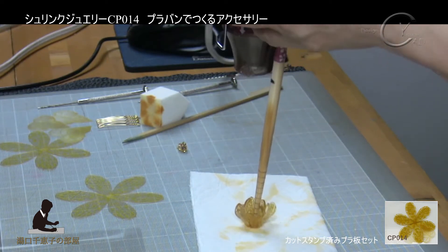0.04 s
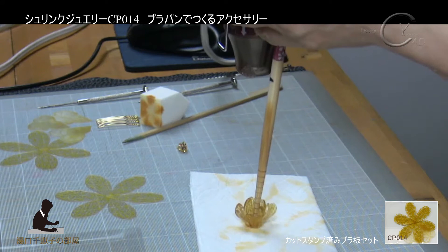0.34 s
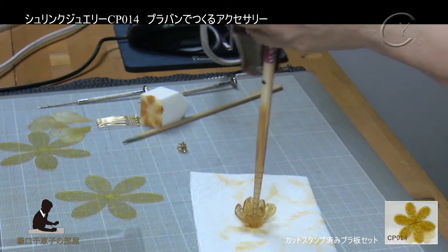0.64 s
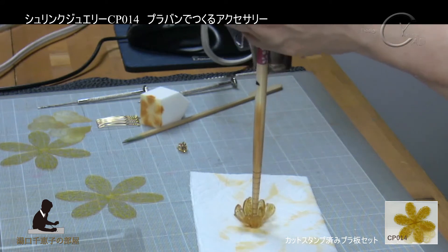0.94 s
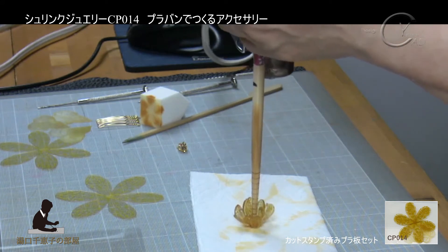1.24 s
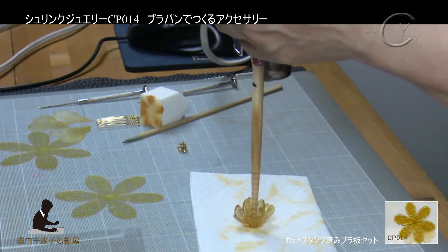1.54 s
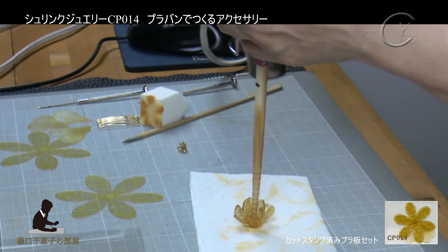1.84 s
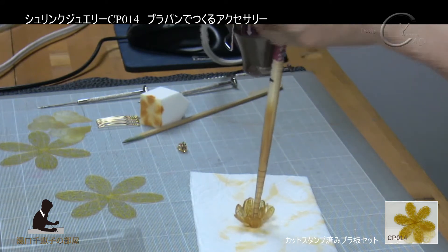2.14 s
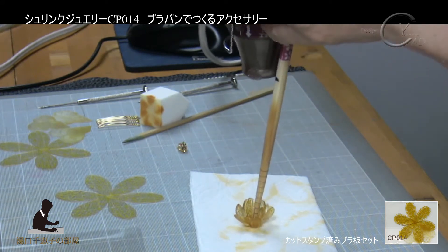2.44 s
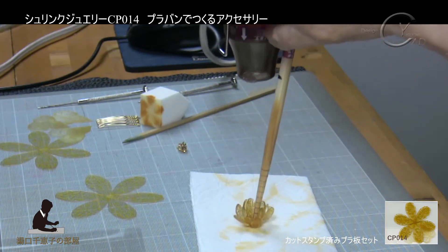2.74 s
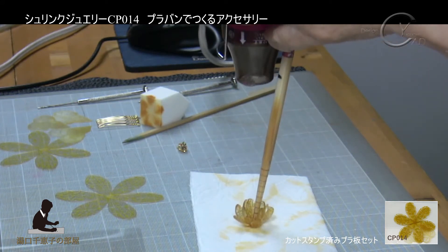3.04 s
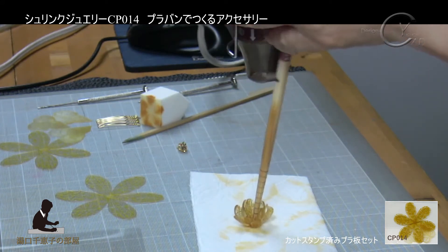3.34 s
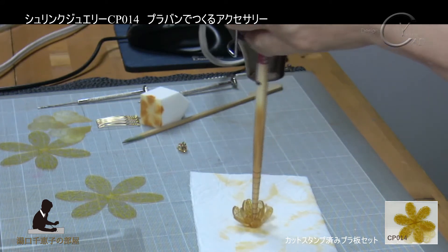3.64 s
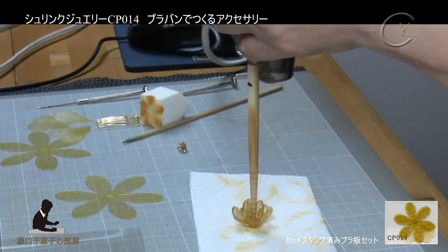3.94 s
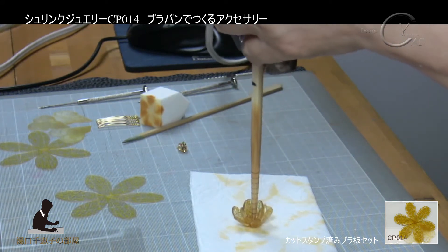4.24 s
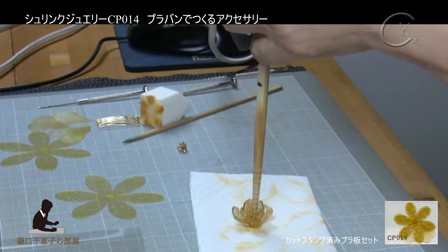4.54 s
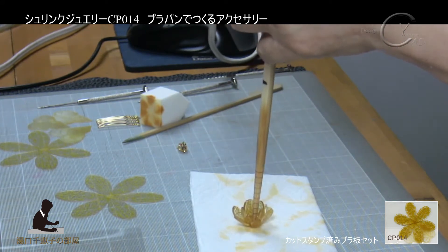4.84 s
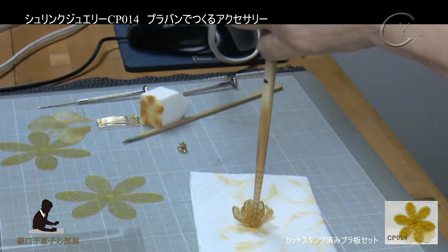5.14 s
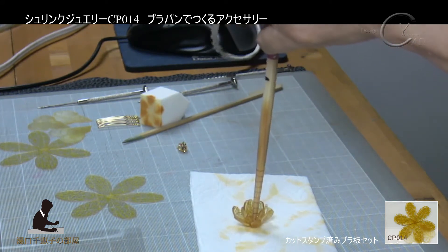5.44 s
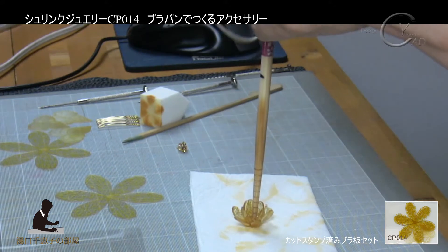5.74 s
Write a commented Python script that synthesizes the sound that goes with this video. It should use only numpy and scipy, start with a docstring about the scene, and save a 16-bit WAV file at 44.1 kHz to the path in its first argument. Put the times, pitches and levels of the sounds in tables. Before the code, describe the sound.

Close hissing air and a fan's whine from a handheld heat gun, cut by a switch snap, then a falling whirr.

```python
"""A close rush of air with a whine on top: a small heat gun sways in the hand over a craft table.
Its five-blade fan whines over air rushing through the barrel, and the table top throws the hiss back.
At about 5.1 s the thumb snaps the switch off and the fan glides down to rest, its bearings whirring.
The grip rustles and the gun is shifted with a light knock, in a small, quiet room."""
import sys
import numpy as np
from scipy import signal
from scipy.fft import rfft, irfft
from scipy.io import wavfile
from scipy.ndimage import uniform_filter1d

SR = 44100
rng = np.random.default_rng(int(sys.argv[2]) if len(sys.argv) > 2 else 0)


def file_out(sig):
    """Save sig as 16-bit WAV at sys.argv[1]."""
    # one column per channel
    cols = np.atleast_2d(sig).T
    # limit, then scale
    lim = np.clip(cols, -1, 1)
    pcm = np.round(lim * 32767).astype(np.int16)
    wavfile.write(sys.argv[1], SR, pcm)


N = 258852
TIME = np.arange(N) / SR


def amp(db):
    """Decibels to gain."""
    return np.exp(np.asarray(db) * (np.log(10) / 20))


def unit(x):
    """Scales to rms 1."""
    return x / np.sqrt(np.mean(x ** 2) + 1e-20)


def curves(rows, t=TIME):
    """Automation lanes: each column of (t/s, ...) rows, joined by straight lines."""
    times, *columns = np.transpose(rows)
    return [np.interp(t, times, column) for column in columns]


def spectrum(points, hz):
    """Reads (f/Hz, value) points on a log-frequency axis."""
    f, value = np.transpose(points)
    return np.interp(np.log(hz + 1), np.log(f), value)


def bumps(modes, hz):
    """EQ curve in dB from (f/Hz, width/Hz, gain/dB) resonances."""
    return sum(db / (1 + (2 * (hz - f) / width) ** 2) for f, width, db in modes)


def hump(t, peak_s, attack_s, release_s):
    """A smooth swell to 1 and a smooth fall."""
    return np.exp(-((t - peak_s) / np.where(t < peak_s, attack_s, release_s)) ** 2)


def drift(rate_hz, size=4096):
    """Random modulation of rms 1, up to about the given rate."""
    hz = np.fft.rfftfreq(size, TIME[-1] / size)
    slow = irfft(rfft(rng.standard_normal(size)) / (1 + (hz / rate_hz) ** 4))
    return np.interp(TIME, np.linspace(0, TIME[-1], size), unit(slow))


def patches(shape, frames, bins):
    """Random time-frequency patches of rms 1."""
    smeared = uniform_filter1d(rng.standard_normal(shape), frames, 0)
    return unit(uniform_filter1d(smeared, bins, 1))


def noise(field_db, size=2048):
    """Noise of rms 1 whose short-time spectrum takes the shape of field_db(t, hz)."""
    hop = size // 4
    t, hz = np.arange(N // hop + 5)[:, None] * hop / SR, np.fft.rfftfreq(size, 1 / SR)
    white = rng.standard_normal((len(t), len(hz), 2)) @ [1, 1j]
    shaped = white * amp(field_db(t, hz))
    return unit(signal.istft(shaped.T, nperseg=size, noverlap=size - hop)[1][:N])


# shaft speed under power: (t/s, speed/(turns/s))
POWERED_SPEED = [(0.05, 247.4), (0.42, 247.4), (0.75, 248.6), (1.1, 247.3), (1.6, 247.9), (2.25, 248.8),
                 (3.0, 249.2), (3.6, 248.5), (5.1, 248.4)]
OFF_S = 5.13  # the power is cut


def shaft_speed(t=TIME, drag_s=0.37, friction_turns_per_s2=146):
    """Turns per second, at least 1: near steady under power, then slowed by air drag and friction."""
    friction = friction_turns_per_s2 * drag_s
    drag = np.exp(-np.maximum(t - OFF_S, 0) / drag_s)
    return np.maximum((curves(POWERED_SPEED, t)[0] + friction) * drag - friction, 1)


def slowing(t=TIME):
    """Speed against full speed, in decades: about 0 under power, negative while coasting."""
    return np.log10(shaft_speed(t) / shaft_speed(OFF_S))


# the hand's sway: (t/s, pose/(- left, + right), table echo delay/ms, hiss towards the microphone/dB)
SWAY = [(0, -0.34, 1.7, -.5), (.8, 0.85, 0.76, 0), (1.7, 0.48, 1.07, -1), (2.3, -.7, 1.15, -0.8),
        (2.95, -1.4, 0.92, -0.5), (3.65, 0.39, 0.91, -1), (4.35, 0.71, 0.99, 0.9), (4.7, 0.29, 1.9, -1),
        (5.1, -1.1, 2.1, -1)]
# tone curve of the rushing air: (f/Hz, relative level/dB)
AIR_COLOUR = [(25, -118.7), (60, -113.3), (150, -96), (400, -88), (560, -74.5), (1000, -70), (2000, -71.5),
              (2850, -74.5), (3400, -80.5), (5000, -82.5), (8700, -83), (9800, -90.5), (12300, -93.5),
              (15600, -110.7)]
# the barrel's resonances and notches, lowest first: (f/Hz, width/Hz, gain/dB)
BARREL_EQ = [(621, 166, 13.5), (920, 19, 4.5), (1143, 13, 7), (1243, 228, -15), (1527, 570, 5.5),
             (1730, 18, 6), (1956, 42, 7.5), (2130, 68, 7), (2470, 180, -1), (2630, 363, 11.5),
             (3074, 116, -15.5), (3120, 61, 11.5), (3740, 390, -6), (6240, 1300, 8.5), (7260, 590, -6),
             (10350, 220, 5)]
# resonances of the vents when fully open: (f/Hz, width/Hz, gain/dB)
VENT_EQ = [(3070, 370, 14), (2550, 900, -5), (5200, 1500, 6), (6230, 600, -5.5), (7200, 1000, 6)]
# upper barrel resonances that swell with the sway: (f/Hz, width/Hz, gain/dB per unit sideways, drift/dB)
SWELL_EQ = [(2170, 170, 2.5, 2), (2820, 390, -0.9, 0.5)]
# the jet's strongest gusts, at the barrel's lowest resonance: (t/s, length/s, boost/dB)
JET_GUSTS = [(.46, .08, 2.5), (0.796, 0.1, 6), (1.416, 0.17, 5.5), (2.868, .05, 9.5), (2.974, 0.021, 11),
             (3.96, 0.032, 7), (4.645, 0.08, 4.5)]


def air(level_db=-34.5, body_fall_db=60, hiss_fall_db=72, hiss_hz=3800, table_echo=0.081,
        eddy_db=2.14, streak_db=3.5, burble_db=0.7, lull_db=-1.2):
    """Turbulence coloured by barrel and vents and combed by the table's echo; it dies with the fan."""
    def field_db(t, hz):
        side, echo_ms, facing_db = curves(SWAY, t)
        treble = hz ** 4 / (hz ** 4 + hiss_hz ** 4)
        # reaching for the switch, the hand uncovers the vents
        vents_open = np.interp(t, [4.43, 4.86], [0.085, 0.58])
        colour = spectrum(AIR_COLOUR, hz) + bumps(BARREL_EQ, hz) + vents_open * bumps(VENT_EQ, hz)
        echo = table_echo * treble * np.exp(2j * np.pi * hz * echo_ms / 1000)
        comb = 20 * np.log10(abs(1 + echo))
        # the jet burbles at random between its strong gusts
        gusts = sum(db * hump(t, s, length / 2, length / 2) for s, length, db in JET_GUSTS)
        jet_db = lull_db + gusts + burble_db * np.interp(t, TIME, drift(rate_hz=35))
        jet_hz, jet_width, _ = BARREL_EQ[0]
        burble = bumps([(jet_hz, 2 * jet_width, jet_db)], hz)
        swell = bumps([(f, width, side_db * side + drift_db * np.interp(t, TIME, drift(rate_hz=5.6)))
                       for f, width, side_db, drift_db in SWELL_EQ], hz)
        # brief eddies stir the body of the rush; narrow, longer streaks whistle in the hiss
        eddies = eddy_db * (1 - treble) * patches(comb.shape, frames=6, bins=12)
        streaks = streak_db * treble * patches(comb.shape, frames=22, bins=5)
        fall = slowing(t) * (body_fall_db * (1 - treble) + hiss_fall_db * treble)
        return colour + treble * facing_db + comb + burble + swell + eddies + streaks + fall
    return amp(level_db) * noise(field_db)


def shaft_tone(angle, order, db, phase=0):
    """A sine at a multiple of the shaft's speed, its rms level in dB."""
    return np.sqrt(2) * amp(db) * np.cos(order * angle + phase)


# the whine, each partial beamed its own way:
# (shaft order, level/dB, gain/dB per unit sideways, gain/dB per ms of echo delay)
WHINE_PARTIALS = [(4, -44, -0.1, -1.2), (5, -41.5, -1, -2), (6, -39.5, 0.8, 2.5), (9, -47.5, 6, 1.5)]


def fan_whine(angle, waver_db=1.33, usual_echo_ms=0.98):
    """Uneven blades: the blade tone and its neighbours are in step, so the whine throbs once a turn."""
    side, echo_ms, _ = curves(SWAY)
    lift_ms = echo_ms - usual_echo_ms
    return sum(shaft_tone(angle, k, db + side_db * side + lift_db * lift_ms + waver_db * drift(37))
               for k, db, side_db, lift_db in WHINE_PARTIALS)


# the motor's faint buzz: (shaft order, level/dB)
BUZZ_PARTIALS = [(3, -54), (7, -55), (10, -58), (15, -70), (16, -69), (18, -65), (20, -69), (21, -68),
                 (22, -67), (24, -66), (25, -62), (26, -68), (30, -61), (31, -68), (32, -68), (33, -70),
                 (37, -71), (38, -71), (40, -70), (45, -78), (48, -77)]


def motor_buzz(angle, sway_db=4.0, flutter_db=1.0):
    """Short waves that come and go at random as the gun sways, and flutter in the hot air."""
    return sum(shaft_tone(angle, k, db + sway_db * drift(rate_hz=1.5) + flutter_db * drift(rate_hz=30),
                          phase=2 * np.pi * rng.random()) for k, db in BUZZ_PARTIALS)


# tone curve of the quiet room, also the base of whirr and rustle: (f/Hz, relative level/dB)
ROOM_COLOUR = [(25, -42), (60, -38), (140, -5), (290, -2), (400, -4), (1000, -1), (2200, -6.5), (2850, -5),
               (3500, -9.5), (6000, -11), (10000, -17.5), (15500, -30)]


def room_tone(level_db=-62):
    """A steady, dull bed of noise under everything."""
    return amp(level_db) * noise(lambda t, hz: spectrum(ROOM_COLOUR, hz))


# resonances rung by the shaft: (f/Hz, width/Hz, gain/dB)
WHIRR_EQ = [(2900, 260, 9), (7600, 4700, 10)]


def bearings(level_db=-54, fall_db=19, tilt_db=7):
    """The shaft's dry whirr rings the housing; it outlasts the rush of air."""
    whirr = noise(lambda t, hz: spectrum(ROOM_COLOUR, hz) + tilt_db * np.log10(hz + 1)
                  + bumps(WHIRR_EQ, hz))
    return amp(level_db + fall_db * slowing()) * whirr


# the room's decay times: (f/Hz, t60/s)
ROOM_DECAY = [(200, 0.29), (1500, 0.16), (6000, 0.088), (14000, 0.18)]


def reverb(send, onset_s=0.012, size=256):
    """A small room's tail: dense reflections, each band dying at its own speed."""
    hz, t, bands = signal.stft(rng.standard_normal(SR // 2), SR, nperseg=size)
    decay = np.exp(-np.log(1000) * t / spectrum(ROOM_DECAY, hz)[:, None])
    tail = signal.istft(bands * decay, SR, nperseg=size)[1]
    tail *= np.clip(np.arange(len(tail)) / SR / onset_s, 0, 1)
    return signal.fftconvolve(send, tail / np.linalg.norm(tail))[:N]


def thumb_scrape(level_db=-37, low_cut_hz=2700, tilt_db=6):
    """The thumb scrapes brightly on the rocker as it pushes it over."""
    rub = noise(lambda t, hz: spectrum(AIR_COLOUR, hz) + bumps(VENT_EQ, hz) / 2
                + tilt_db * np.log10(hz + 1))
    scrape = unit(signal.sosfilt(signal.butter(4, low_cut_hz, "high", fs=SR, output="sos"), rub))
    return amp(level_db) * hump(TIME, peak_s=5.132, attack_s=0.034, release_s=0.034) * scrape


# resonances that the falling blade tones sweep through: (f/Hz, width/Hz, gain/dB)
COAST_EQ = [(956, 210, 6.5), (1440, 110, 12), (2930, 280, -3)]


def coasting_blades(angle, blades=5, blade_db=-42, overtone_db=-53.5, tilt_db=-10.5, fall_db=28.5,
                    flutter_db=2.5, cutoff_hz=540):
    """The blade tone and its overtones glide down; below its cut-off the barrel radiates little."""
    blade_hz, fade_db = blades * shaft_speed(), fall_db * slowing()
    full_speed_db = spectrum(AIR_COLOUR, blades * shaft_speed(OFF_S))
    out = np.zeros(N)
    for k in range(1, 7):
        hz = k * blade_hz
        db = blade_db if k == 1 else overtone_db + tilt_db * np.log10(k / 2)
        colour = spectrum(AIR_COLOUR, hz) - full_speed_db + bumps(COAST_EQ, hz)
        flutter = flutter_db * drift(rate_hz=160)
        radiated = 1 / np.sqrt(1 + (cutoff_hz / hz) ** 12)
        out += radiated * shaft_tone(angle, k * blades, db + colour + fade_db + flutter)
    return out


def strikes(hits, modes, bright_hz=5000, size=4096):
    """Each hit rings the same modes; sharper hits favour the high ones."""
    t, out = np.arange(size) / SR, np.zeros(N + size)
    for s, db, bright_db in hits:
        for k, (hz, mode_db, t60) in enumerate(modes):
            ring = np.exp(-np.log(1000) * t / t60) * np.sin(2 * np.pi * hz * t)
            gain = amp(db + mode_db + bright_db * hz ** 2 / (hz ** 2 + bright_hz ** 2))
            out[round(s * SR):][:size] += (-1) ** k * gain * ring  # neighbours swing opposite ways
    return out[:N]


# the rocker's hits: (t/s, level/dB, treble shelf/dB)
SWITCH_HITS = [(5.1425, -23, 5), (5.1442, -22, 12), (5.145, -7.5, -6.5), (5.1457, -0.5, -13.5),
               (5.1465, -10, -1.5), (5.1485, -20.5, 8)]
# modes of the plastic housing: (f/Hz, level/dB, t60/s)
HOUSING_RING = [(136, -41.5, 0.019), (235, -32, 0.0098), (1110, -28, 0.0089), (2864, -5.5, 0.0076),
                (2950, -1.5, 0.011), (3980, -8.5, 0.0049), (4930, -16, 0.013), (5670, -9.5, 0.011),
                (6960, -4.5, 0.0028), (7820, -6, .006), (9020, -8, 0.0083), (11000, -12.5, 0.0018),
                (14000, -15, .0012)]


def switch_snap():
    """The rocker tips, snaps over and chatters, ringing the housing."""
    return strikes(SWITCH_HITS, HOUSING_RING)


def grip_rustle(level_db=-58.5, tilt_db=3):
    """A soft brush of noise as the hand shifts its grip."""
    rustle = noise(lambda t, hz: spectrum(ROOM_COLOUR, hz) + tilt_db * np.log10(hz + 1))
    return amp(level_db) * hump(TIME, peak_s=5.778, attack_s=0.014, release_s=0.016) * rustle


# the knock and its rebounds: (t/s, level/dB, treble shelf/dB)
KNOCK_HITS = [(5.8486, -27.5, 0), (5.8494, -42, -5), (5.8518, -38, 0), (5.8543, -40, -11),
              (5.8622, -46, -10)]
# modes the knock rings: (f/Hz, level/dB, t60/s)
KNOCK_RING = [(864, -13.5, 0.022), (1280, -6, 0.016), (1610, -4, 0.01), (2400, -6.5, 0.017),
              (2870, -8, .008), (3830, 3, 0.0064), (4150, 4, 0.0053), (6100, -10, 0.0046),
              (8500, -11, 0.0028)]


def knock():
    """The shifted gun knocks lightly and rebounds."""
    return strikes(KNOCK_HITS, KNOCK_RING)


def scene(jitter=0.000995, motor_fade_s=0.02, click_send_db=-12, fan_send_db=-17):
    """The close mono mix; at power-off, whine and buzz crossfade into the coasting blades."""
    speed = shaft_speed() * (1 + jitter * drift(rate_hz=32.2))
    angle = 2 * np.pi * np.cumsum(speed) / SR  # one shaft drives every tone
    powered = np.clip(1 - (TIME - OFF_S) / motor_fade_s, 0, 1)
    fan = np.sqrt(powered) * (fan_whine(angle) + motor_buzz(angle))
    fan += np.sqrt(1 - powered) * coasting_blades(angle)
    clicks = switch_snap() + knock()
    room = room_tone() + reverb(amp(click_send_db) * clicks + amp(fan_send_db) * fan)
    return (air() + fan + bearings() + thumb_scrape() + clicks + grip_rustle() + room)[None]


def record(dry, low_cut_hz=50, high_cut_hz=15750):
    """The microphone's bass roll-off and a steep cut of the very top."""
    thin = signal.sosfilt(signal.butter(2, low_cut_hz, "high", fs=SR, output="sos"), dry)
    high_cut = signal.firwin(511, high_cut_hz, window=("kaiser", 9), fs=SR)
    return signal.oaconvolve(thin, high_cut[None], "same")


dry = scene()
out = record(dry)
file_out(out)
```